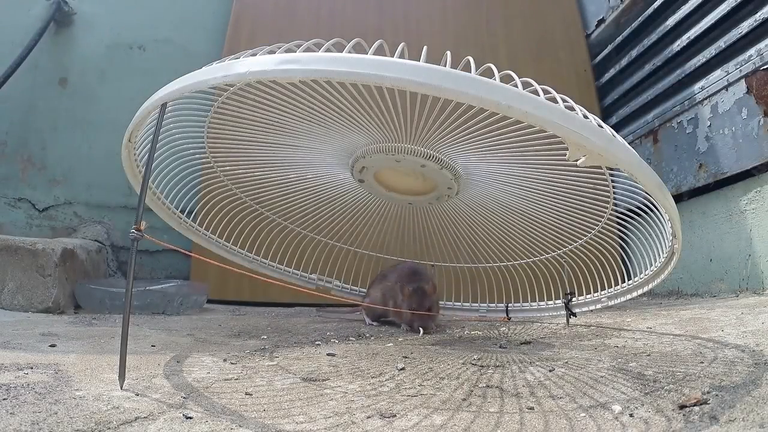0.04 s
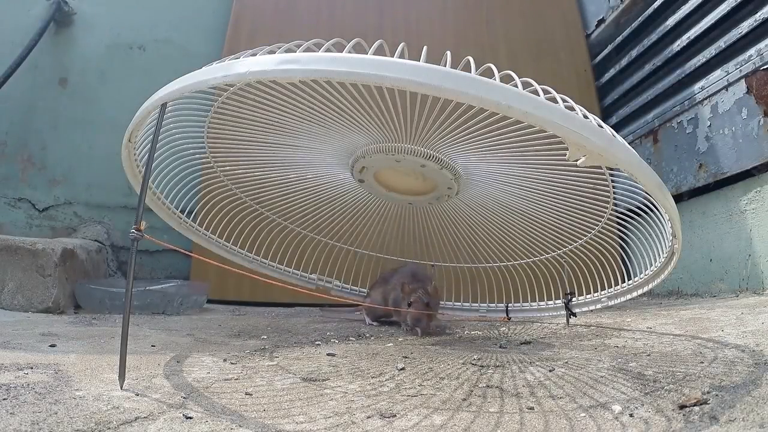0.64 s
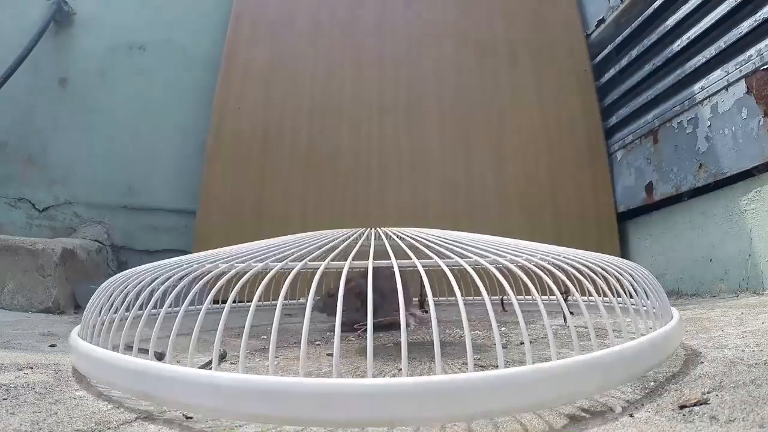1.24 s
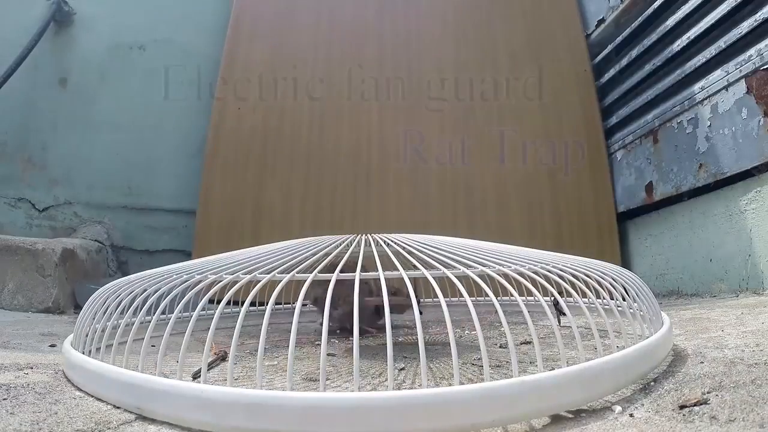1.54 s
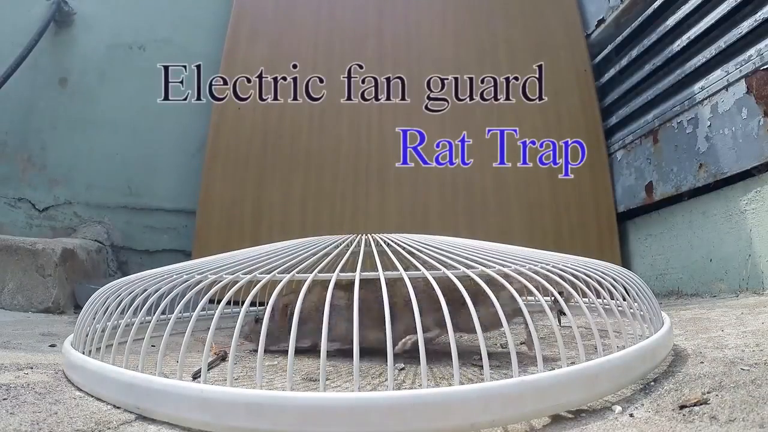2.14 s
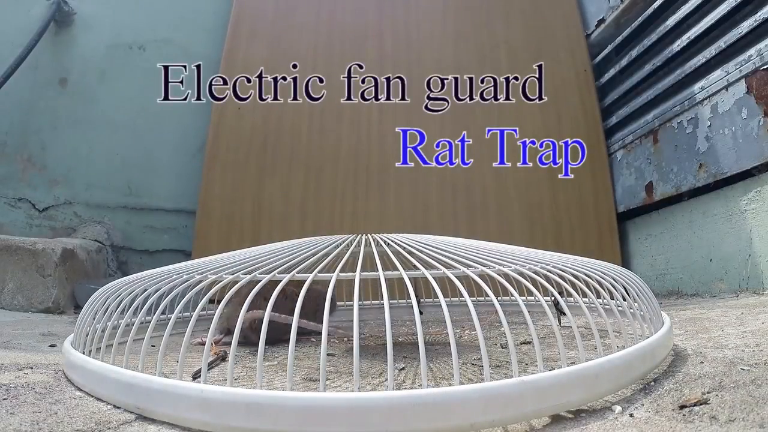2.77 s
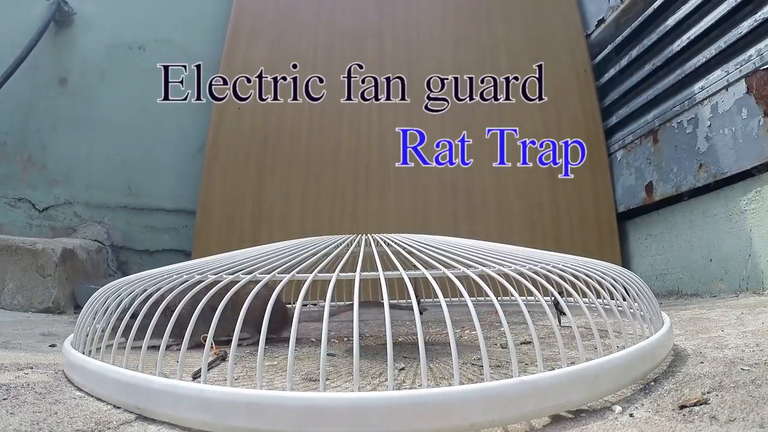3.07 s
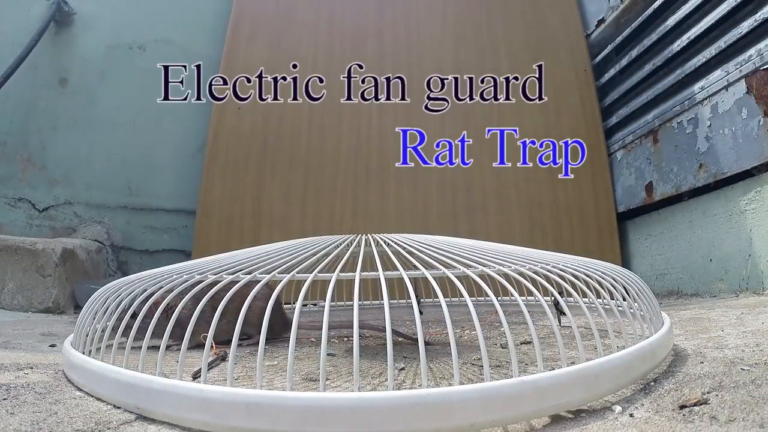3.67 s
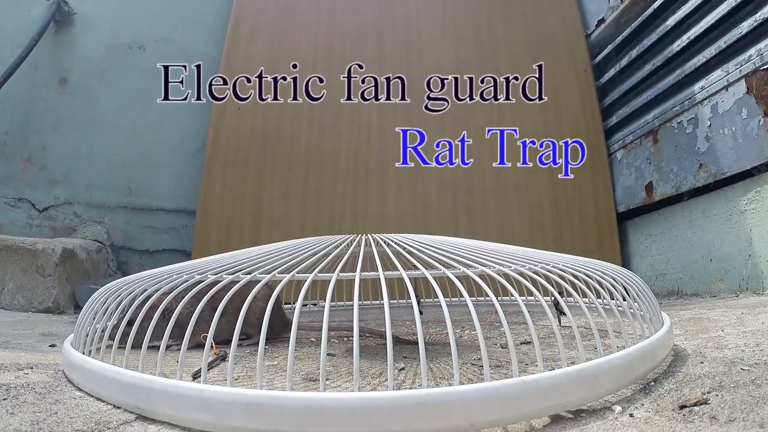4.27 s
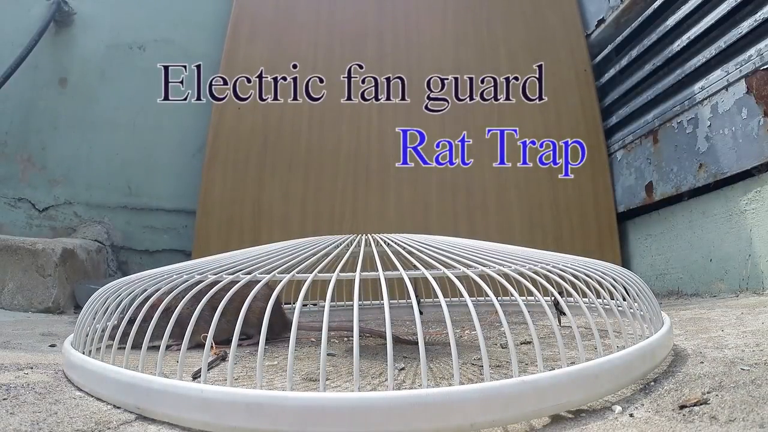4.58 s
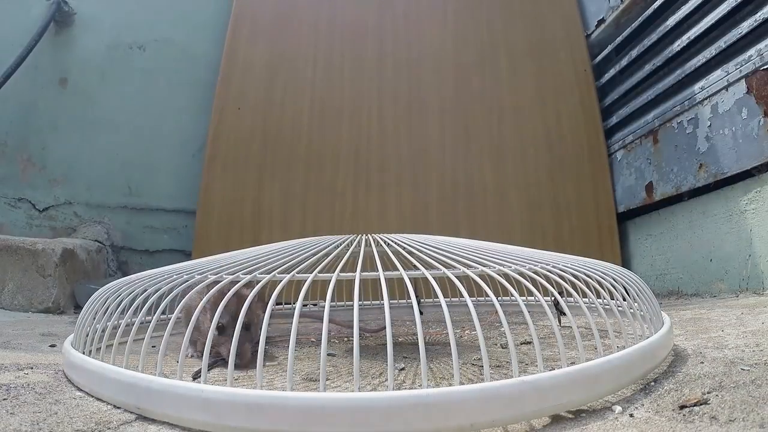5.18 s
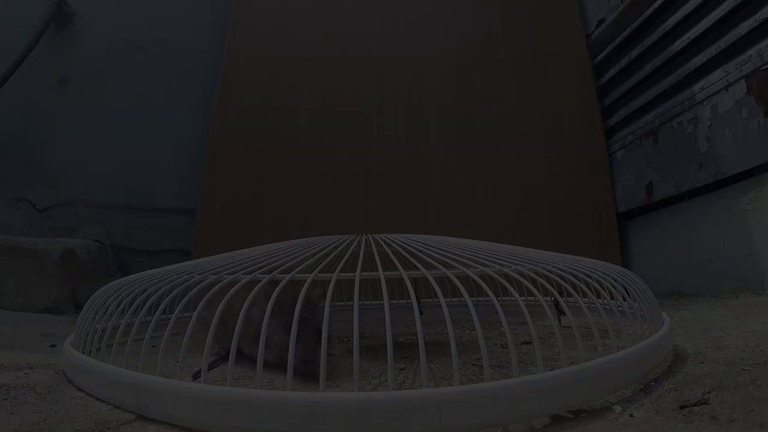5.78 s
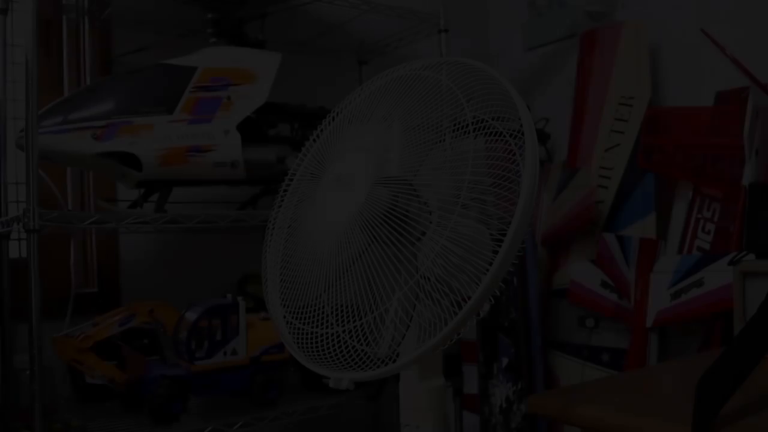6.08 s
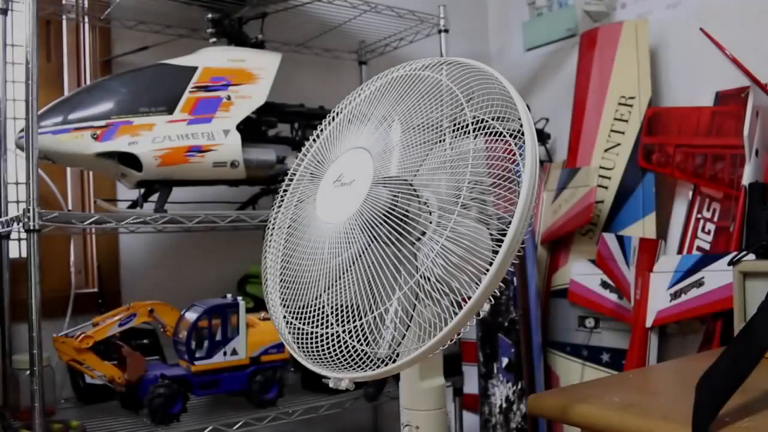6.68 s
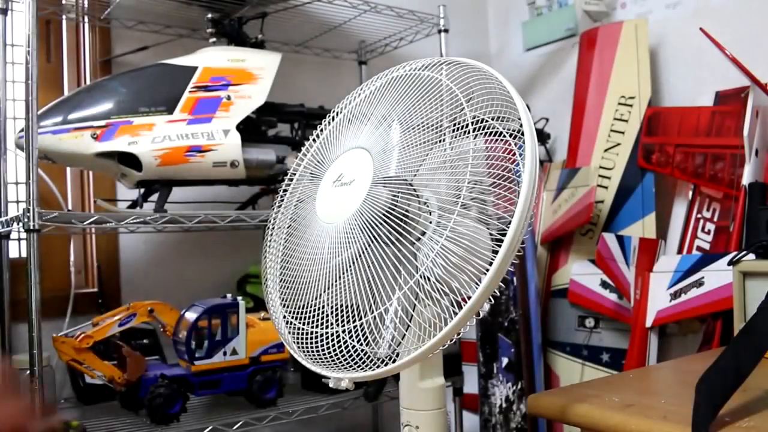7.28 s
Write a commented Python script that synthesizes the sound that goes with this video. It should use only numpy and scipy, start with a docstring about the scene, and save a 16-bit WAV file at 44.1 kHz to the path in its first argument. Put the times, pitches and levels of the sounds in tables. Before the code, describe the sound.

In a quiet yard, a small bird chirps faintly over distant traffic and an engine's drone. A steel pin jingles and a wire fan guard slams onto concrete close by, rattling and ringing. A rat bumps the wires and scratches lightly. A far vehicle swells and recedes. The yard fades to silence, and a room fades in, where an electric fan rushes softly over its motor's hum.

```python
"""A small bird chirps over a distant engine's drone and the rumble of traffic. A wire fan guard with a
plastic rim, propped on a steel pin, drops on concrete over a rat: each impact excites decaying modes, so
the pin jingles and the guard slams, rattles and rings. The rat bumps the wires and scratches in short
bursts of noise. A far vehicle swells and recedes as its distance changes. The yard fades out, and a room
fades in where an electric fan's turbulent air rushes over the hum of its motor."""
import sys
import numpy as np
from scipy import signal
from scipy.fft import rfft, irfft, next_fast_len
from scipy.io import wavfile

SR = 44100
rng = np.random.default_rng(int(sys.argv[2]) if len(sys.argv) > 2 else 0)


def write(x):
    x = np.atleast_2d(x).T
    wavfile.write(sys.argv[1], SR, np.round(np.clip(x, -1, 1) * 32767).astype(np.int16))


N = 322812
TIME = np.arange(N) / SR

# Levels are relative; a spectrum gives level per unit bandwidth; t60 is the time to decay by 60 dB.
# the bird's chirps: t/s, level/dB
BIRD_CHIRPS = [(-.09, -51.5), (0.079, -53)]
CHIRP_S, CHIRP_TOP_HZ, CHIRP_FALL_HZ = 0.12, 7950, 2500

# the distant engine's firing tone: t/s, f/Hz, level/dB
ENGINE_FIRING = [(0.0, 57.3, -54), (0.19, 54.86, -49), (0.61, 54.9, -47.5), (0.89, 54.9, -45),
                 (1.04, 59.75, -63), (1.12, 59.4, -43), (1.3, 60.6, -49), (1.62, 61.07, -38),
                 (1.92, 60.33, -44), (2.5, 59.35, -34), (2.86, 58.73, -46.5), (3.65, 56.38, -42.5),
                 (3.92, 56.3, -33.5), (4.3, 54.77, -43.5), (4.72, 53.97, -36), (5.37, 52.34, -37.5),
                 (5.65, 52, -44.5)]
# its harmonics: multiple, level/dB
ENGINE_HARMONICS = [(1, 0.5), (2, -17), (4, -28)]
# harmonics of the exhaust: multiple, level/dB
EXHAUST_HARMONICS = [(3, -13.5), (4, -5), (5, -5), (6, -12), (10, -13), (11, -16), (16, -15.5)]
EXHAUST_LAG_S, EXHAUST_WIDTH_S = 0.045, 0.42  # it points backwards, so it peaks just after the pass
# traffic rumble: t/s, level/dB
STREET_LEVEL = [(1.2, -45), (1.8, -41.5), (4.2, -43.5)]
# its spectrum: f/Hz, level/dB
STREET_SPECTRUM = [(12, -35.5), (20, -1), (44, -4.5), (70, -0.5), (185, -13), (372, -14.5), (452, -19),
                   (614, -19), (906, -21), (6540, -45.5), (12100, -57.5), (14300, -67.5), (15500, -81)]

# grit and claws tick on wire and concrete: t/s, level/dB, f/Hz
GRIT_TICKS = [(1.2117, -37, 6520), (1.217, -40, 7500), (1.3092, -27, 9450), (1.3218, -26.5, 9960),
              (1.3315, -23, 9000), (1.4668, -10, 5720), (1.4728, -19, 7500), (1.5297, -10.5, 8480),
              (1.5645, -12.5, 8360), (1.6885, -33, 6503), (2.124, -37, 9300), (2.1356, -35, 8400),
              (2.1508, -31.5, 8000), (2.1612, -32, 7720), (2.1638, -32, 8015), (5.74, -47, 4214),
              (5.818, -48, 4790)]

# pin, ground, then rat knock the guard: t/s, level/dB, spectral tilt/(dB per octave), crack hardness/dB
GUARD_KNOCKS = [(1.2944, -29, -2, 5), (1.317, -38, -2, 3), (1.3238, -32, -2, 3), (1.332, -34, -2, 4),
                (1.3378, -10, 2, 3), (1.3392, -8, -2.5, -0.5), (1.3522, -16.5, 3, 1),
                (1.357, -17.5, 3.5, -3), (1.3705, -25, 0.5, 2), (1.377, -23, 0, 2), (1.4067, -21, 1, 3),
                (1.415, -23, 0.5, 3.5), (1.4305, -25, 0.5, 5), (1.458, -30, 0.5, 4), (1.466, -28, 1.5, 3.5),
                (1.492, -23.5, -3, 0.5), (1.5075, -32.5, -2, 2), (1.5294, -33.5, -3.5, 3),
                (1.5643, -41, 4.5, 4.5), (1.5935, -41.5, -3, 2), (2.012, -45, -1.5, 3),
                (2.0377, -32, -4, -2), (2.0425, -37, -5, 0), (2.049, -39.5, -5.5, -1.5),
                (2.0838, -48, -1, 0), (2.4894, -49, -5, -2), (2.5139, -42.5, -6.5, -2),
                (2.5494, -49, -6.5, -2)]
PIVOT_HZ, TILT_TOP_HZ = 1980, 8000  # the tilt turns about the pivot and levels off above the top
THUD_PER_TILT = 2.8  # dB less thud for each dB per octave of tilt
# spectrum of the contact crack: f/Hz, level/dB
CRACK_SPECTRUM = [(100, -15), (330, 2), (640, -4.5), (1130, 6), (1500, 7.5), (1780, -5), (2150, 1),
                  (2550, -2), (2900, 4), (3300, -3), (3700, 6), (4700, -7), (5900, -2.5), (8500, -13),
                  (12000, -18), (15000, -28)]
# strong modes of the guard, each split among near-alike spokes: f/Hz, spread/Hz, level/dB, t60/s
STRONG_MODES = [(187, 4.8, -9, 0.34), (229.5, 6.4, -11, .45), (293.5, 31, -6.5, 0.19),
                (367.2, 30, -6.5, 0.13), (691, 7.4, -11.5, 0.74), (983, 55, -2.5, .55),
                (1482, 65, -3, 0.61), (2020, 90, -17.5, 0.76), (2280, 90, -15.5, .8),
                (2423, 25, -13.5, 0.52), (2600, 27, -6, 0.31), (3000, 15, -13.5, 0.42),
                (3250, 150, -16, .7), (3700, 47, -5.5, 0.4), (4200, 125, 3.5, 0.26), (4730, 30, -8, 0.34),
                (4817, 30, -10.5, .33), (8660, 200, -14.5, .38)]
# spectrum of the crowded weaker modes between them: f/Hz, level/dB
SPOKE_SPECTRUM = [(90, -7.5), (200, -4), (390, -2), (530, -2), (800, -3), (1200, -4.5), (1550, -3),
                  (1950, -5.5), (3500, -4), (6000, -12), (9000, -16.5), (12000, -23.5), (15000, -36)]
# their decay: f/Hz, t60/s
SPOKE_T60 = [(150, 0.44), (500, 0.64), (1500, 0.63), (4000, 0.37), (8000, 0.47), (14000, 0.3)]
# the settling rim, then the leaning rat, damp the ring: t/s, level/dB
RING_DAMPING = [(1.38, 0), (1.5, -2), (1.92, -1), (1.99, -5)]
FREE_FROM_S, FREE_UNTIL_S = 1.335, 1.8  # outside this span the guard is held by the pin or the ground
HELD_SPOKES_DB, HELD_MODES_DB, HELD_THUD_DB, HELD_DB_PER_S = 2, 0.5, -11, -60
PROPPED_DB = -7  # it rings less while it leans on the pin

# blows on the steel pin: t/s, level/dB
PIN_BLOWS = [(1.2971, -28), (1.3092, -31), (1.321, -25.5), (1.3322, -35), (1.368, -35), (1.407, -39),
             (1.456, -40), (1.499, -42), (1.507, -36), (1.531, -43), (1.5652, -48)]
# its bending modes: f/Hz, waver/Hz, level/dB, t60/s
PIN_BENDING_MODES = [(1169, 53, -8, 0.03), (2750, 20, -23, 0.07), (7428, 30, 1, 0.21),
                     (14500, 110, -5, .18)]

# mode pairs of the whole hoop: f/Hz, beat/Hz, level/dB, t60/s
HOOP_PAIRS = [(381, 7.7, -34.5, 1.6), (517, 10, -42, 1.5), (890, 9.6, -42, 1.5), (953, 8.7, -33.8, 2.7),
              (1012, 13, -41, 2.3), (1110, 22, -47, 1.6), (1478, 16, -41.5, 1.6), (2000, 27, -49, 1.6),
              (2260, 23, -49, 1.7), (2430, 14, -48.5, 1.3), (3225, 16, -48, 1.2), (3750, 61, -52.5, 1.1),
              (4140, 37, -51, 1.1), (4670, 53, -49.5, 1.05)]
LANDING_S, HOOP_TWIN_DB = 1.339, -7.5
LEAN_S, LEAN_DB_PER_S = 1.914, -17  # the rat leans on the hoop
RATTLE_S, RATTLE_GAP_S, RATTLE_DB, RATTLE_DB_PER_S = 1.3445, .016, -22, -170

# the rat's scratches: t/s, gap between claws/s, level/dB, f/Hz
PAW_SCRATCHES = [(1.979, .008, -44, 8030), (2.201, .0073, -41, 7150)]

# tyre noise of the passing vehicle: f/Hz, level/dB
TYRE_SPECTRUM = [(60, -14.5), (160, -2), (290, 0.5), (450, -7.5), (620, -5), (780, -8.5), (950, -6.5),
                 (2000, -21), (3600, -25), (6000, -37), (9000, -44), (15000, -54.5)]
PASS_S, PASS_DB, PASS_WIDTH_S = 3.2, -41.5, 0.36  # width: nearest distance over speed
PASS_FALLOFF = 2.35  # power of distance; over 1 because walls screen the vehicle
# the low rush and hiss of its tail: f/Hz, level/dB
TAIL_SPECTRUM = [(80, -14.5), (270, 2), (600, -5.5), (950, -12.5), (2000, -21), (4000, -23), (7000, -42.5),
                 (15000, -58)]
TAIL_S, TAIL_DB, TAIL_WIDTH_S = 3.45, -3, 0.18

# the room fan's rush of air: f/Hz, level/dB
AIR_SPECTRUM = [(30, -9), (80, -8), (115, -1), (220, -4), (450, -7), (1260, -6.5), (1330, -3.5),
                (1440, -1.5), (1560, -7), (1690, -4), (1850, -10.5), (2550, -12), (3000, -16.5),
                (3450, -17), (4700, -22.5), (15500, -35.5)]
# its motor's tones: f/Hz, level/dB
MOTOR_HUM = [(120, -9), (179.5, -11.5), (240, -10), (300, -16.5), (360, -17), (937, -13.5), (1347, -10.5),
             (1490, -13)]
# weighting of the rush in the stereo side signal: f/Hz, level/dB
SIDE_WEIGHTING = [(60, -13), (110, -14), (200, -15), (380, -14), (700, -15), (1290, -9), (2380, -3.5),
                  (4400, -1), (8120, 0), (15000, -1)]
FAN_DB = -48.5
SWELL_S, SWELL_WIDTH_S, SWELL_DB = 6.96, 0.1, 2.5  # the rush swells once, briefly

FADE_OUT_S, SILENT_S, FADE_IN_END_S = 5.13, 6.035, 6.91
CUTOFF_HZ = 15700


def from_db(db):
    """Amplitude ratio of a level in decibels."""
    return 10 ** (np.asarray(db) / 20)


def in_time(rows):
    """Linear interpolation in time, one curve per column."""
    s, *columns = np.transpose(rows)
    return [np.interp(TIME, s, c) for c in columns]


def at_hz(points, hz):
    """Interpolation on a logarithmic frequency axis."""
    f, value = np.transpose(points)
    return np.interp(np.log(np.maximum(hz, 1)), np.log(f), value)


def add(track, s, sound):
    """Superposition: a sound joins the track at time s."""
    i = max(round(s * SR), 0)
    track[i:i + len(sound)] += sound[:N - i]


def drift(rate, t=TIME):
    """Random modulation: straight lines through `rate` Gaussian values a second."""
    knots = rng.standard_normal(4096)
    return np.interp(t * rate, np.arange(len(knots)), knots)


def coloured(spectrum):
    """Spectral shaping of white noise, scaled to unit rms."""
    size = next_fast_len(N)
    hz = np.arange(size // 2 + 1) * SR / size
    gain = from_db(at_hz(spectrum, hz)) * (hz > 15)
    noise = irfft(rfft(rng.standard_normal(size)) * gain, size)[:N]
    return noise / np.sqrt(np.mean(noise ** 2) + 1e-20)


def bird(rasp_hz=1800, swell=1.6, echo_t60=0.64, level_db=-3.5):
    """Frequency modulation turns a falling whistle raspy; reverberation off the yard walls smears it."""
    out, whistle, t = np.zeros(N), 0, TIME[:SR // 2]
    for s, db in BIRD_CHIRPS:
        progress = np.clip((t - s) / CHIRP_S, 0, 1)
        hz = CHIRP_TOP_HZ - progress ** 2 * (CHIRP_FALL_HZ + rasp_hz * drift(1500, t))
        envelope = from_db(db) * np.sin(np.pi * progress ** swell)
        whistle += envelope * np.sin(2 * np.pi * np.cumsum(hz) / SR)
    walls = rng.standard_normal(len(t)) * from_db(-60 * t / echo_t60)
    add(out, 0, 0.7 * whistle)
    add(out, 0, signal.fftconvolve(whistle, walls / np.linalg.norm(walls)))
    return from_db(level_db) * out


def engine(waver_hz=0.7, waver_db=5.0):
    """Periodic firing gives a harmonic series: the low tones carry far, the exhaust only in passing."""
    hz, db = in_time(ENGINE_FIRING)
    phase = 2 * np.pi * np.cumsum(hz + waver_hz * drift(14)) / SR
    drone = sum(from_db(level) * np.sin(k * phase) for k, level in ENGINE_HARMONICS)
    exhaust = sum(from_db(level + waver_db * drift(12)) * np.sin(k * phase)
                  for k, level in EXHAUST_HARMONICS)
    return np.sqrt(2) * from_db(db) * drone + passing(PASS_S + EXHAUST_LAG_S, EXHAUST_WIDTH_S) * exhaust


def street():
    """Incoherent sources add up to noise: traffic merges into a low rumble."""
    return from_db(in_time(STREET_LEVEL)[0]) * coloured(STREET_SPECTRUM)


def ticks(edge_ratio=1.19, snap_t60=0.0041, tail_db=-19.0, tail_t60=0.073, level_db=-2.5):
    """Brief contacts excite high frequencies: grit and claws snap brightly, then ring faintly."""
    out, t = np.zeros(N), TIME[:SR // 10]
    envelope = from_db(-60 * t / snap_t60) + from_db(tail_db - 60 * t / tail_t60)
    for s, db, hz in [*GRIT_TICKS, *claws(count=4)]:
        band = signal.butter(2, [hz / edge_ratio, hz * edge_ratio], "band", fs=SR, output="sos")
        burst = envelope * rng.standard_normal(len(t))
        add(out, s, from_db(db + level_db) * signal.sosfilt(band, burst))
    return out


def crowded_modes(spectrum, decay, count):
    """Random modes of unit total power, their modal density highest in the bass: f/Hz, level/dB, t60/s."""
    places = np.arange(count) + rng.random(count)
    hz = np.interp(places, [0, count], np.sqrt([80, 15700])) ** 2
    db = at_hz(spectrum, hz) + 10 * np.log10(np.sqrt(hz))  # where modes are sparser, each carries more
    total_db = 10 * np.log10(np.sum(from_db(db) ** 2) / 2)
    return hz, db - total_db, at_hz(decay, hz)


def split(modes, count):
    """Mode splitting: each mode becomes detuned partials that beat: f/Hz, level/dB, t60/s."""
    hz, spread_hz, db, t60 = np.repeat(modes, count, axis=0).T
    place = (np.arange(len(hz)) % count + rng.random(len(hz))) / count
    return hz + spread_hz * (2 * place - 1), db - 10 * np.log10(count), t60


def struck(hz, db, t60, t, tilts):
    """Modal superposition, one row per blow; each has its own tilt, so it rings brighter or duller."""
    t, omega, decay_rate = np.float32(t), np.float32(2 * np.pi * hz), np.float32(np.log(1000) / t60)
    rings = np.sin(np.outer(omega, t)) * np.exp(np.outer(-decay_rate, t))
    signs = rng.choice([-1, 1], (len(tilts), len(hz)))  # each blow lands on a different spot
    octaves = np.log2(np.minimum(hz, TILT_TOP_HZ) / PIVOT_HZ)
    strengths = signs * from_db(db + tilts[:, None] * octaves)
    return np.float32(strengths) @ rings


def guard(spokes_db=-16.5, modes_db=-17.5, crack_t60=.024,
          thud_db=-6.5, thud_hz=262, thud_t60=0.046, chatter_db=2.0):
    """Impact excitation: each knock cracks at the contact, thumps the rim and sets the spokes ringing."""
    contact, ringing, t = np.zeros(N), np.zeros(N), TIME[:SR * 2 // 3]
    knocks = np.vstack([GUARD_KNOCKS, rattle(count=13)])
    tilts = knocks[:, 2]
    cracks = struck(*crowded_modes(CRACK_SPECTRUM, [(1000, crack_t60)], count=600), t[:SR // 20], tilts)
    crowds = struck(*crowded_modes(SPOKE_SPECTRUM, SPOKE_T60, count=640), t, tilts)
    rings = struck(*split(STRONG_MODES, count=9), t, tilts)
    low_cut = signal.butter(1, thud_hz / 2, "high", fs=SR, output="sos")  # a cage radiates no deep bass
    thud = signal.sosfilt(low_cut, -np.sin(2 * np.pi * thud_hz * t) * from_db(-60 * t / thud_t60))
    for (s, db, tilt, hardness_db), crack, crowd, ring in zip(knocks, cracks, crowds, rings):
        held = not FREE_FROM_S < s < FREE_UNTIL_S
        ring_db = db + (s < FREE_FROM_S) * PROPPED_DB + held * HELD_DB_PER_S * t
        add(contact, s, from_db(db + hardness_db) * crack)
        add(contact, s, from_db(db + thud_db - THUD_PER_TILT * tilt + held * HELD_THUD_DB) * thud)
        add(contact, s, from_db(ring_db + spokes_db + held * HELD_SPOKES_DB) * crowd)
        add(ringing, s, from_db(ring_db + modes_db + held * HELD_MODES_DB) * ring)
    chatter = from_db(chatter_db * drift(70))  # the rim chatters on the ground, so the ring wavers
    damping = from_db(in_time(RING_DAMPING)[0])
    return contact + damping * (chatter * ringing + hoop())


def pin(rise_s=0.002, waver_db=2.5):
    """Bending modes of a bar: the prop tumbles, and each touch checks its ring and starts it afresh."""
    out = np.zeros(N)
    s, db = np.transpose(PIN_BLOWS)
    t = s[0] + TIME[:SR]
    latest = np.searchsorted(s, t, "right") - 1
    lag = np.exp(-1 / (rise_s * SR))
    for hz, waver_hz, mode_db, t60 in PIN_BENDING_MODES:
        decay = from_db(db[latest] - 60 * (t - s[latest]) / t60)
        envelope = signal.lfilter([1 - lag], [1, -lag], decay)
        phase = 2 * np.pi * np.cumsum(hz + waver_hz * drift(140, t)) / SR
        add(out, s[0], envelope * from_db(mode_db + waver_db * drift(130, t)) * np.sin(phase))
    return out


def hoop(waver_share=.0055, waver_db=3.5):
    """Beating mode pairs: the landed hoop rings on, rough as it rocks, until the rat damps it."""
    out, t = np.zeros(N), TIME[:SR]
    leaning_db = LEAN_DB_PER_S * np.maximum(LANDING_S + t - LEAN_S, 0)
    for hz, beat_hz, db, t60 in HOOP_PAIRS:
        phase = 2 * np.pi * np.cumsum(hz * (1 + waver_share * drift(70, t))) / SR
        pair = np.sin(phase) + from_db(HOOP_TWIN_DB) * np.sin(phase + 2 * np.pi * beat_hz * t)
        add(out, LANDING_S, from_db(db - 60 * t / t60 + leaning_db + waver_db * drift(50, t)) * pair)
    return out


def rattle(count, unevenness=.3, mean_tilt=-0.5, tilt_scatter=3.0, hardness_db=-3.0):
    """Inelastic collisions: the rim settles in ever weaker touches; columns as in GUARD_KNOCKS."""
    late, _, bright = rng.uniform(-1, 1, (count, 3)).T
    after_s = RATTLE_GAP_S * (np.arange(count) + unevenness * (late - late[0]))
    db = RATTLE_DB + RATTLE_DB_PER_S * after_s
    tilts = mean_tilt + tilt_scatter * bright
    return np.column_stack([RATTLE_S + after_s, db, tilts, np.full(count, hardness_db)])


def claws(count):
    """A scratch is an impulse train, the claws catching one after another: t/s, level/dB, f/Hz."""
    return [(s + k * gap, db, hz) for s, gap, db, hz in PAW_SCRATCHES for k in range(count)]


def passing(nearest_s, width_s):
    """Spreading and screening: a passing source's amplitude falls as a power of its distance."""
    relative_distance = np.hypot(1, (TIME - nearest_s) / width_s)
    return from_db(PASS_DB) / relative_distance ** PASS_FALLOFF


def vehicle():
    """Moving noise sources swell and recede with distance: first the tyres, then the tail's rush."""
    tail = from_db(TAIL_DB) * passing(TAIL_S, TAIL_WIDTH_S) * coloured(TAIL_SPECTRUM)
    tyres = passing(PASS_S, PASS_WIDTH_S) * coloured(TYRE_SPECTRUM)
    return tyres + tail


def room_fan(hum_waver_db=1.5, side_db=-6.0):
    """Turbulence at the blades rushes over the motor's hum; wall reflections widen the rush a little."""
    hum = sum(from_db(db + hum_waver_db * drift(15)) * np.sin(2 * np.pi * hz * TIME + .5 * drift(19))
              for hz, db in MOTOR_HUM)
    side = from_db(side_db) * coloured([(hz, db + at_hz(SIDE_WEIGHTING, hz)) for hz, db in AIR_SPECTRUM])
    rush = coloured(AIR_SPECTRUM) + side * [[1], [-1]]
    swell = from_db(SWELL_DB * np.exp(-((TIME - SWELL_S) / SWELL_WIDTH_S) ** 2))
    return from_db(FAN_DB) * (swell * rush + hum)


def scene(out_curve=0.96, in_curve=0.98):
    """The yard's sources superpose in mono, then fade through silence to the room in stereo."""
    yard = guard() + pin() + ticks() + bird() + engine() + street() + vehicle()
    fade_out = np.clip((SILENT_S - TIME) / (SILENT_S - FADE_OUT_S), 0, 1) ** out_curve
    fade_in = np.clip((TIME - SILENT_S) / (FADE_IN_END_S - SILENT_S), 0, 1) ** in_curve
    return yard * fade_out + room_fan() * fade_in


def record(dry):
    """Soft saturation rounds the loudest peaks; a steep low-pass filter cuts the highest treble."""
    rounded = 1.1 * np.tanh(dry / 1.1)
    return signal.sosfilt(signal.ellip(10, .1, 80, CUTOFF_HZ, fs=SR, output="sos"), rounded)


dry = scene()
out = record(dry)
write(out)
```